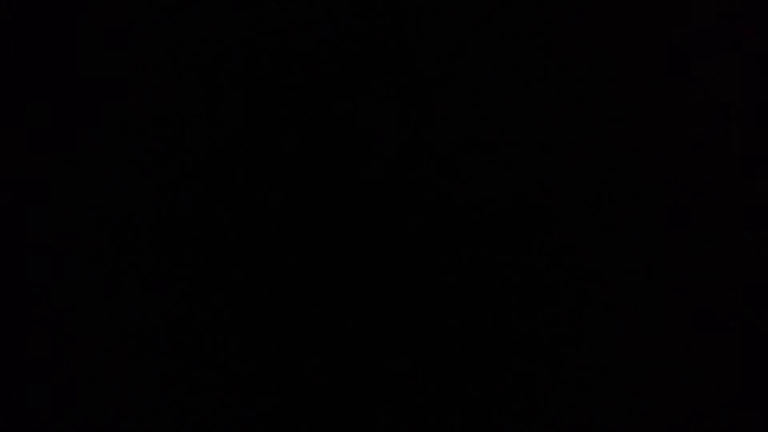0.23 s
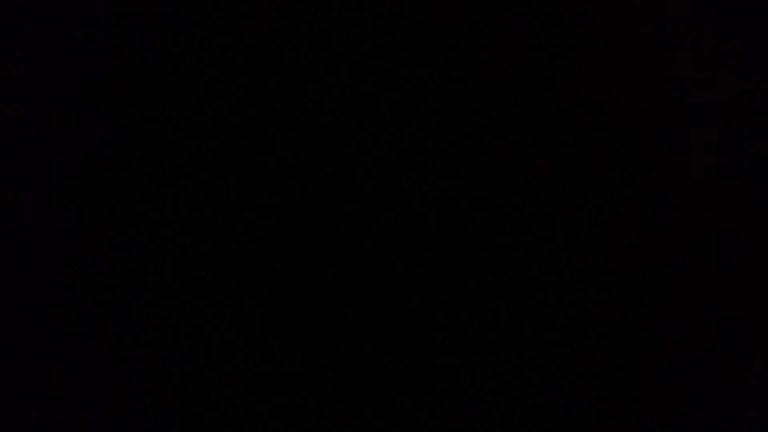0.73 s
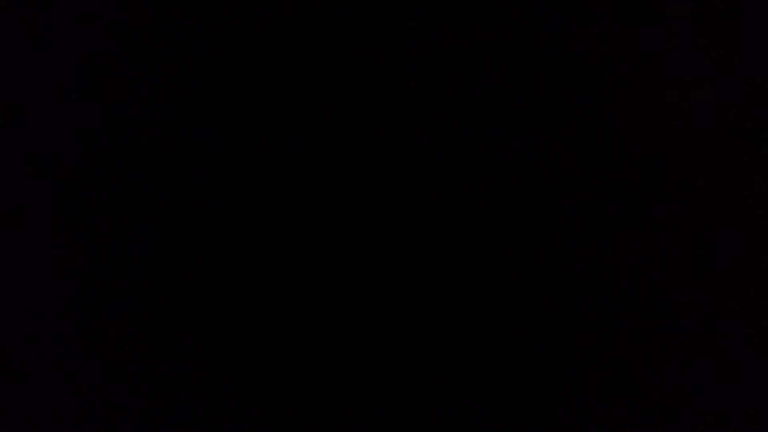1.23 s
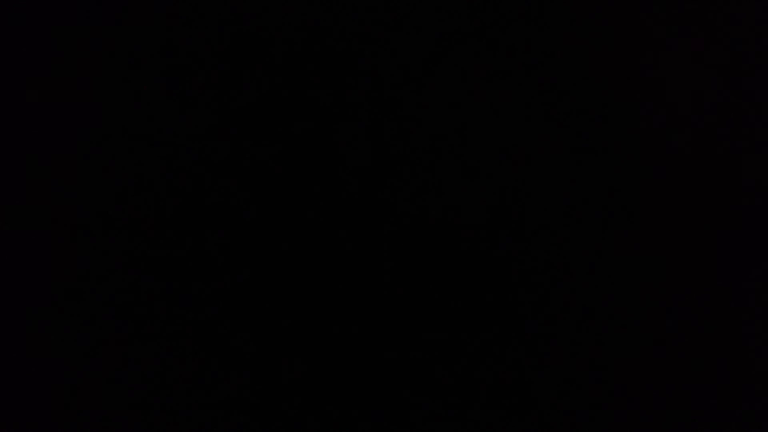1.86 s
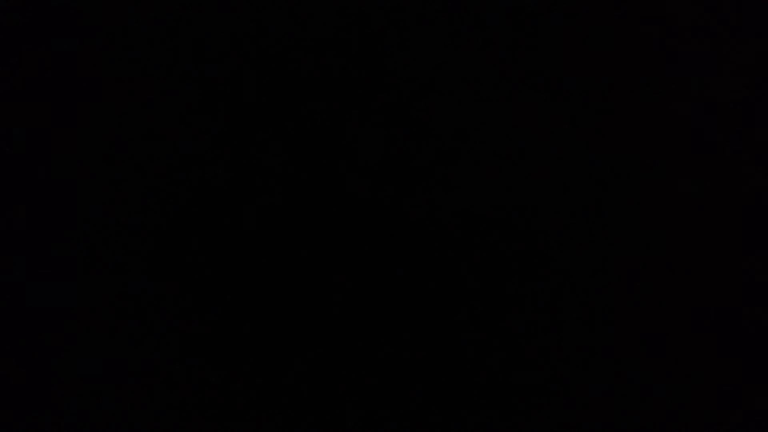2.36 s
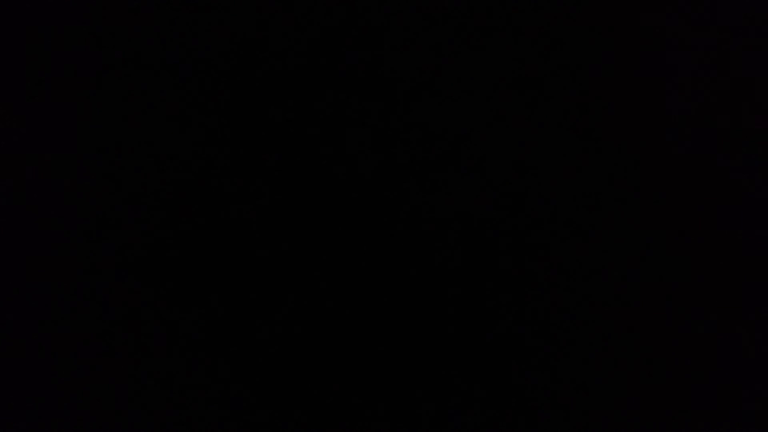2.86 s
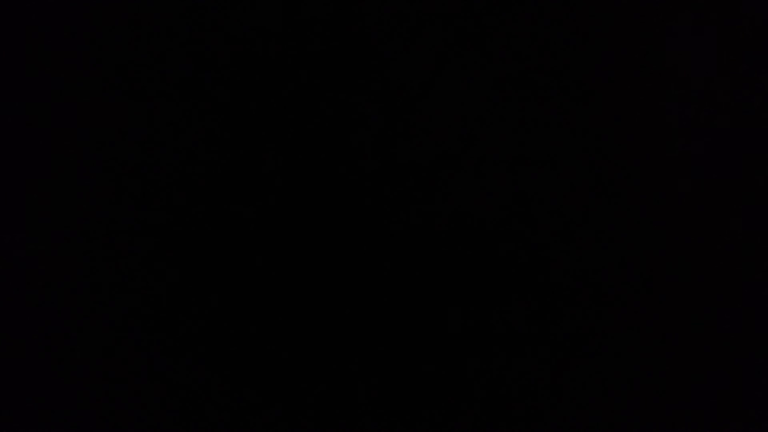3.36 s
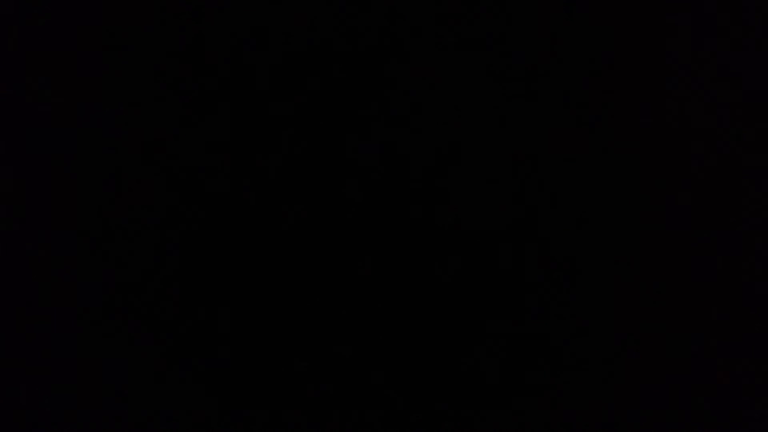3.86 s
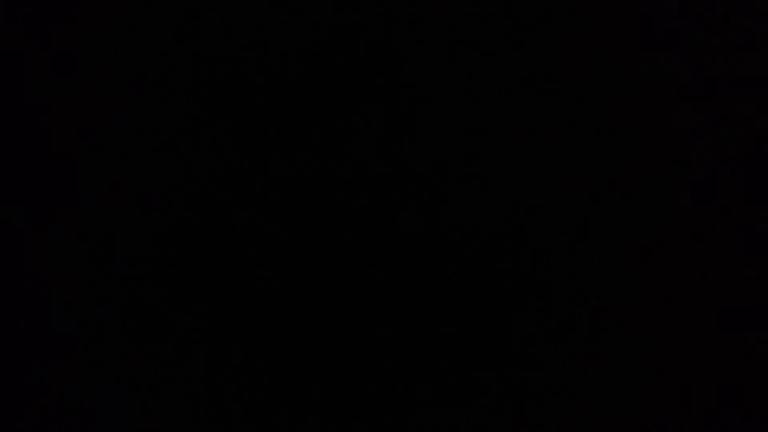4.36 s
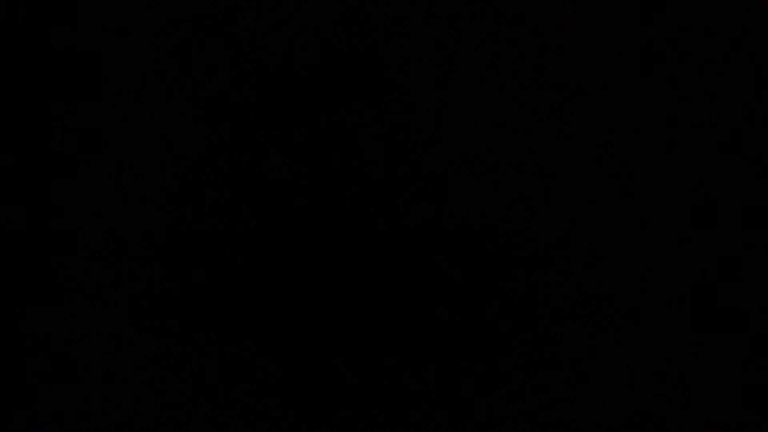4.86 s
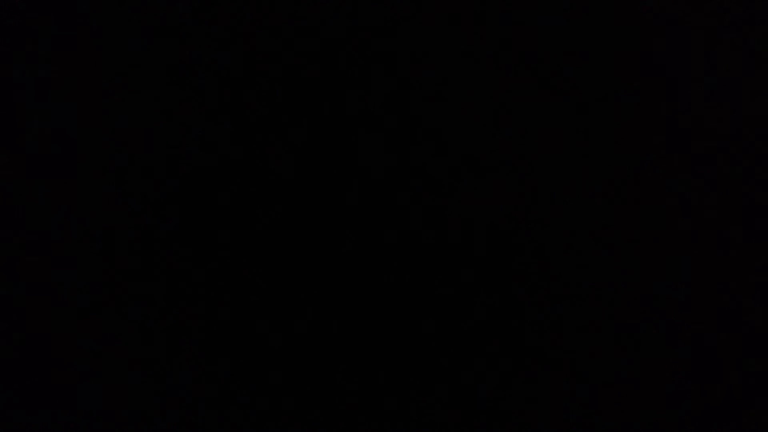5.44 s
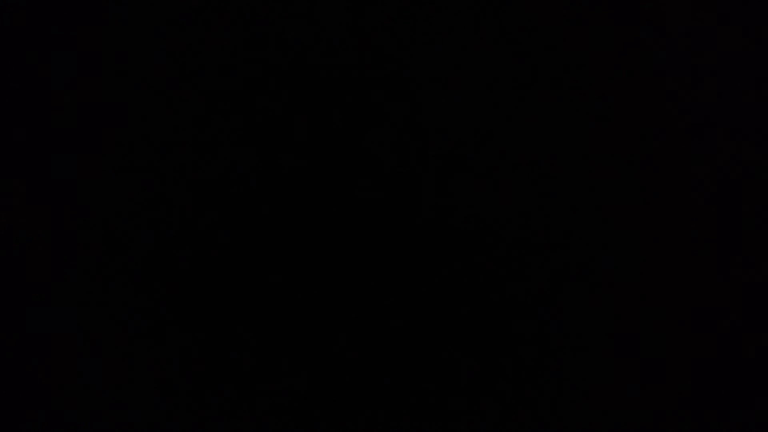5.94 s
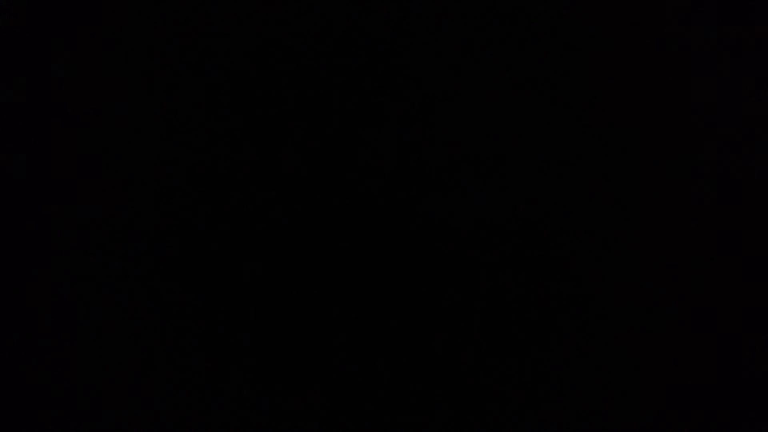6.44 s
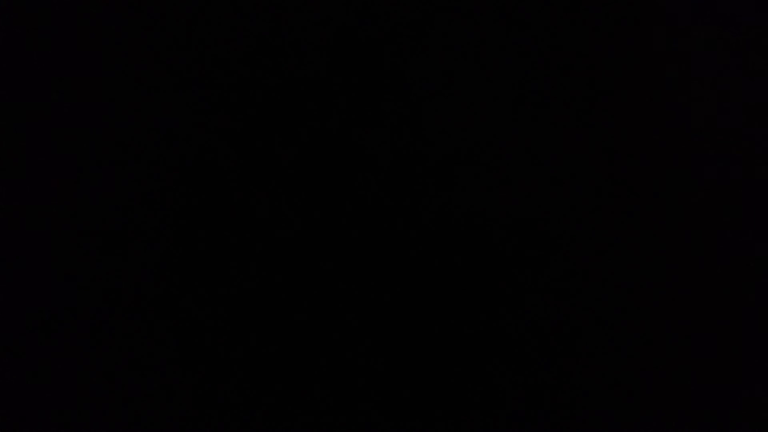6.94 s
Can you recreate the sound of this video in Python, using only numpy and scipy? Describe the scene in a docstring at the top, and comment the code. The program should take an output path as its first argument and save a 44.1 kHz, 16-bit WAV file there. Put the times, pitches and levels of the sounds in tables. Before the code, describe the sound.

A nearby owl calls in the open night air, clear and nearly dry. It starts with soft, brief hoots and moves on to three long ones that slide down in pitch, separated by single short notes. Before, during and after the call, a much quieter chorus of crickets keeps up a high, rapid trill. Faint microphone hiss and occasional dull bumps lie underneath.

```python
"""Owl and crickets at night

A close owl gives a few soft short hoots, then three long, arching, falling ones with a short hoot
between each pair; every hoot is an almost pure tone.
Crickets trill throughout, one short chirp per wing stroke, one of them a little nearer than the rest.
Under them lie faint night air, a few soft low bumps and the hiss of the microphone."""
import sys
import numpy as np
from scipy import signal
from scipy.fft import rfft, irfft, next_fast_len
from scipy.io import wavfile

SR = 44100
rng = np.random.default_rng(int(sys.argv[2]) if len(sys.argv) > 2 else 0)


def wav_out(sig):
    """Save sig, one row per channel (or a flat mono array), as 16-bit PCM at SR to the path in sys.argv[1]."""
    wavfile.write(sys.argv[1], SR, np.round(np.clip(np.atleast_2d(sig).T, -1, 1) * 32767).astype(np.int16))


N = 317685
TIME = np.arange(N) / SR


def owl(flutter_db=1.16, jitter=0.0044, rush_db=-35, puff_db=-51, rasp_db=-34):
    """A near sine that flutters more as the pitch is pushed up, with a little rasp and rushing air."""
    # (start [s], length [s], swell [s], pitch [Hz], level [dB])
    short_hoots = [(2.057, 0.1, 0.047, 555, -41.5), (2.11, .15, 0.036, 535, -56),
                   (2.273, 0.061, .02, 580, -50), (2.295, .238, .18, 574.8, -27.5),
                   (2.605, 0.048, .025, 590, -46), (2.627, .219, 0.12, 590, -32),
                   (3.609, .138, 0.13, 571.5, -33), (4.511, 0.17, 0.094, 580, -32.5)]
    # (start [s], length [s], attack [s], top pitch [Hz], level [dB], scoop [s], top held [s],
    #  bend of the fall [1 = straight], push [s], drop after the push [dB])
    long_hoots = [(2.888, .537, 0.062, 786, -25, .018, 0.0055, 2.1, 0.11, 2),
                  (3.836, .545, 0.1, 780.6, -25.5, .031, .172, 1.555, 0.18, 5.5),
                  (4.76, 0.521, 0.085, 789, -28.5, .024, 0.21, 1.25, .249, 2.5)]
    # rush of air in a forced hoot: (frequency [Hz], relative level [dB])
    rush_spectrum = [(150, -14), (260, 2.5), (450, -3), (680, -5.5), (900, -7.5), (1120, -5.5),
                     (1520, -4.5), (2000, -8.5), (3000, -30.5)]
    hoots = [short_hoot(*row) for row in short_hoots] + [long_hoot(*row) for row in long_hoots]
    loudness = sum(gain for _, gain in hoots)
    pitch = sum(hz * gain for hz, gain in hoots) / (loudness + 1e-18)  # overlaps blend into one voice
    strain = np.interp(pitch, [580, 720], [.4, 1])
    phase = 2 * np.pi * np.cumsum(pitch * (1 + jitter * strain * drift(45))) / SR
    overtones = from_db(-52) * np.sin(2 * phase) + from_db(-58) * np.sin(3 * phase)
    flutter = from_db(flutter_db * strain * drift(55))
    tone = np.sqrt(2) * (np.sin(phase) + strain * overtones) * flutter
    # turbulence rings in the swollen throat, just under the top pitch
    rasp = from_db(rasp_db) * noise_band(620, 770)
    rush = from_db(rush_db) * coloured_noise(rush_spectrum)
    # a hollow puff comes with even the softest hoots and recedes under strain
    puff = from_db(puff_db) * (1 - strain / 2) * np.sqrt(loudness) * noise_band(285, 395)
    return loudness * (tone + strain * (rasp + rush)) + puff


def short_hoot(start, length, swell, hz, db, sag_hz_per_s=48, droop_hz=30.87, droop_s=.071):
    """Pitch and gain of a soft note that swells, sags slowly, then droops as the throat closes."""
    age = TIME - start
    pitch = hz - sag_hz_per_s * age - droop_hz * ramp(1 - (length - age) / droop_s)
    return pitch, from_db(db) * envelope(age, length, swell, release=.053)


def long_hoot(start, length, attack, top_hz, db, scoop, held, bend, push, drop_db,
              scoop_hz=144, end_hz=541, fade_db_per_hz=.045, ease_s=.034):
    """Pitch and gain of an arching note: a hard push up to the top, then an easier, fading fall."""
    age = TIME - start
    below_top_hz = scoop_hz * np.exp(-np.maximum(age, 0) / scoop)
    fallen = ramp((age - held) / (length - held)) ** bend
    pitch = top_hz - below_top_hz - (top_hz - end_hz) * fallen
    level_db = db - fade_db_per_hz * (top_hz - pitch) - drop_db * ramp((age - push) / ease_s)
    return pitch, from_db(level_db) * envelope(age, length, attack, release=.076)


def near_cricket(hz=2445, strokes_per_s=22.15, trim_db=-2, stroke_db=-52, uneven_db=.5, echo_db=-7):
    """A trill of wing strokes in which single strong ones stand out."""
    # strongest wing strokes: (time [s], peak before trim [dB])
    accents = [(0.2056, -45), (1.1469, -47), (1.9128, -45.5), (1.9641, -45), (2.5972, -49), (2.6436, -51.5),
               (2.8708, -45.5), (2.9133, -49), (3.0039, -45.5), (5.3952, -47), (5.44, -48), (5.7523, -48.5),
               (6.6064, -45)]
    times, accent_db = np.transpose(accents)
    margin = 5 / strokes_per_s  # the trill runs on either side of the accents
    times = np.r_[times[0] - margin, times, times[-1] + margin]
    # a whole number of strokes lies between two strong ones
    counts = np.maximum(np.round(np.diff(times) * strokes_per_s), 1)
    beats = np.r_[0, np.cumsum(counts)].astype(int)
    timing, force = rng.standard_normal((beats[-1], 2)).T
    starts = np.interp(np.arange(beats[-1]), beats, times) + .003 * timing
    level_db = stroke_db + uneven_db * np.clip(force, -2, 1.5)
    starts[beats[1:-1]] = times[1:-1]
    level_db[beats[1:-1]] = accent_db
    trill = wing_strokes(starts, from_db(level_db), hz, length=.012, fall=.033)
    return from_db(trim_db) * (trill + from_db(echo_db) * scatter(trill, t60=.17))


def far_crickets(uneven_db=3.5, echo_db=-2, wash_db=-62.5, waver_db=1.2):
    """Each trills at its own pitch and pace, blurred by the foliage; the whole chorus wavers."""
    # single crickets: (pitch [Hz], pace [strokes/s], level [dB])
    crickets = [(2137, 18, -73.5), (2322, 20.6, -70), (2409, 27, -69), (2486.5, 29, -68), (2569, 23.1, -71),
                (2652, 24.2, -76.5)]
    # the most distant ones, merged into a wash: (frequency [Hz], relative level [dB])
    wash_spectrum = [(1900, -40.5), (2100, -13), (2280, -4.5), (2440, 2.5), (2560, -2.5), (2700, -13.5),
                     (2850, -29.5), (3000, -39.5)]
    chorus = from_db(wash_db) * coloured_noise(wash_spectrum)
    for hz, strokes_per_s, level_db in crickets:
        timing, force = rng.standard_normal((2, 220))
        starts = np.cumsum(1 + .06 * timing) / strokes_per_s - rng.uniform(.1, .2)
        trill = wing_strokes(starts, from_db(uneven_db * np.minimum(force, 2)), hz)
        chorus += from_db(level_db) * rms_one(trill + from_db(echo_db) * scatter(trill, t60=.18))
    return chorus * from_db(waver_db * drift(9.8))


def wing_strokes(starts, gains, hz, length=.014, fall=.05):
    """Each closing of the wings is a short tone that sinks in pitch as the scraper slows."""
    age = TIME[:int(length * SR)]
    progress = age / length
    trill = np.zeros(N + SR)
    for start, gain, (detune, turn) in zip(starts, gains, rng.standard_normal((len(starts), 2))):
        if 0 <= start < N / SR:
            pitch = hz * (1 + .011 * detune + fall * (.5 - progress))
            phase = 2 * np.pi * (np.cumsum(pitch) / SR + turn)
            at = int(start * SR)
            trill[at:at + len(age)] += gain * np.sin(np.pi * progress) * np.sin(phase)
    return trill[:N]


def bumps(width_s=.006):
    """Dull, heavily damped thuds of little more than one swing."""
    # (time [s], envelope peak [dB], pitch [Hz])
    thuds = [(0.415, -48, 87), (0.551, -63, 190), (0.713, -61, 233), (0.785, -58.5, 199),
             (1.098, -43.5, 82), (1.572, -45.5, 72), (3.953, -46.5, 90), (6.497, -54, 95), (6.63, -54, 87),
             (6.834, -57, 125)]
    track = np.zeros(N)
    for centre, db, hz in thuds:
        offset = TIME - centre
        track -= from_db(db) * np.sin(2 * np.pi * hz * offset) * np.exp(-.5 * (offset / width_s) ** 2)
    return track


def night_air(air_db=-62.5, rumble_trim_db=2.5, lumpy_db=5):
    """A bed of steady hiss, with a lumpy rumble and a faint rustle that rise and sink."""
    # night air and microphone hiss: (frequency [Hz], relative level [dB])
    air_spectrum = [(20, -19.5), (60, -7), (170, 1), (260, -4), (360, 0.5), (600, -1), (1000, -4.5),
                    (1400, -4), (2000, -9), (2900, -12.5), (3600, -11), (4400, -7.5), (5600, -14.5),
                    (9000, -16.5), (15000, -17.5)]
    # fader of the low rumble: (time [s], level before trim [dB])
    rumble_fader = [(0.0, -83), (0.34, -71), (0.9, -73.5), (2.06, -76), (5.09, -73.5), (5.94, -77.5),
                    (6.34, -69.5), (7.2, -72)]
    # fader of the far rustle: (time [s], level [dB])
    rustle_fader = [(0, -64.5), (0.998, -64.5), (1.6, -71), (2.4, -64), (5.4, -67.5), (6.549, -66),
                    (7.2, -68.5)]
    rumble_db = np.interp(TIME, *np.transpose(rumble_fader)) + rumble_trim_db
    rustle_db = np.interp(TIME, *np.transpose(rustle_fader))
    rumble = from_db(rumble_db + lumpy_db * drift(13)) * noise_band(48, 115)
    rustle = from_db(rustle_db) * noise_band(470, 1030)
    return from_db(air_db) * coloured_noise(air_spectrum) + rumble + rustle


def scatter(x, t60):
    """Many small reflections from leaves and trunks, dying away; the level is kept."""
    age = TIME[:SR // 2]
    echoes = rng.standard_normal(len(age)) * from_db(-60 * age / t60)
    return rms_one(signal.fftconvolve(x, echoes)[:N]) * np.std(x)


def coloured_noise(spectrum):
    """Noise shaped to a (frequency [Hz], level [dB]) outline; rms 1."""
    hz, db = np.transpose(spectrum)
    size = next_fast_len(N)
    bins = np.maximum(np.arange(size // 2 + 1) * SR / size, 1)
    gain = from_db(np.interp(np.log(bins), np.log(hz), db))
    return rms_one(irfft(rfft(rng.standard_normal(size)) * gain, size)[:N])


def noise_band(low_hz, high_hz):
    """Band-passed noise; rms 1."""
    bandpass = signal.butter(2, [low_hz, high_hz], "band", fs=SR, output="sos")
    return rms_one(signal.sosfilt(bandpass, rng.standard_normal(N)))


def drift(rate_hz):
    """Smooth random modulation, rolling off above rate_hz; rms 1."""
    pole = np.exp(-2 * np.pi * rate_hz / SR)
    return rms_one(signal.lfilter([1], [1, -2 * pole, pole * pole], rng.standard_normal(N + SR))[SR:])


def envelope(age, length, attack, release):
    """Rounded attack, hold, rounded release."""
    fade_in = np.sin(np.pi / 2 * ramp(age / attack))
    fade_out = np.sin(np.pi / 2 * ramp((length - age) / release))
    return (fade_in * fade_out) ** 2


def ramp(x):
    """Hold between 0 and 1."""
    return np.clip(x, 0, 1)


def from_db(db):
    """Decibels to gain."""
    return 10 ** (np.asarray(db) / 20)


def rms_one(x):
    """Scale to rms 1."""
    return x / np.sqrt(np.mean(x ** 2) + 1e-20)


def scene(owl_echo_db=-36):
    """Mono mix: the owl sits close and nearly dry against the crickets."""
    call = owl()
    echo = from_db(owl_echo_db) * scatter(call, t60=.61)
    return (call + echo + near_cricket() + far_crickets() + bumps() + night_air())[None]


def record(dry, cutoff_hz=15250):
    """A steep high cut on the whole mix."""
    return signal.sosfilt(signal.ellip(12, .1, 80, cutoff_hz, fs=SR, output="sos"), dry)


dry = scene()
out = record(dry)
wav_out(out)
```